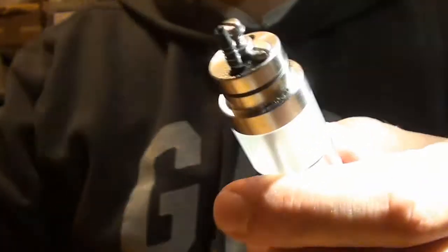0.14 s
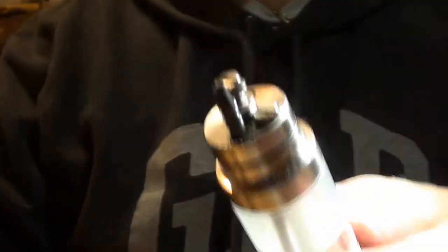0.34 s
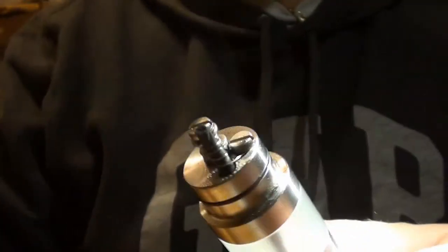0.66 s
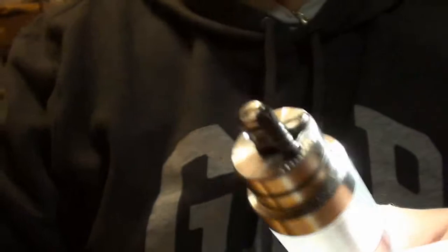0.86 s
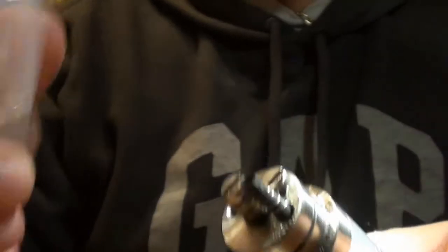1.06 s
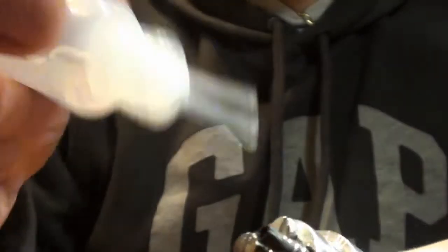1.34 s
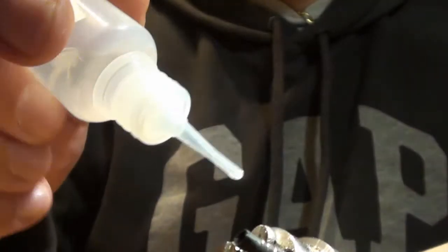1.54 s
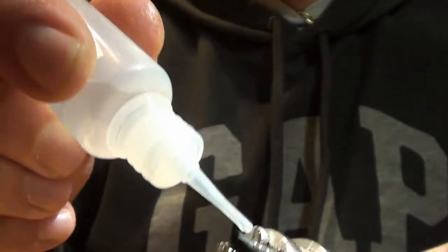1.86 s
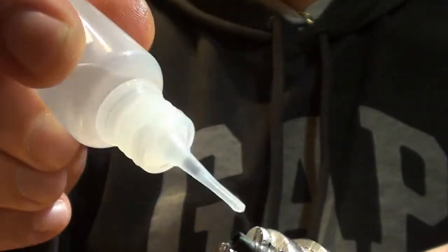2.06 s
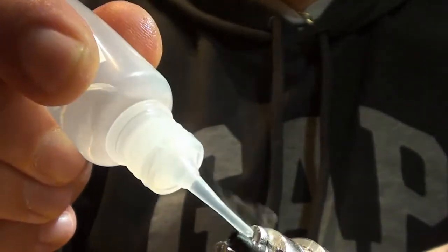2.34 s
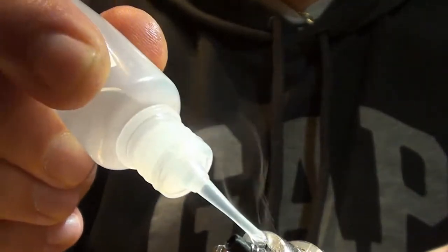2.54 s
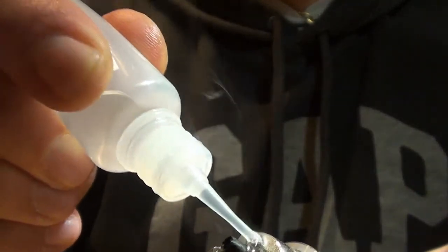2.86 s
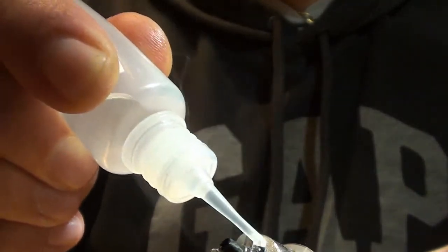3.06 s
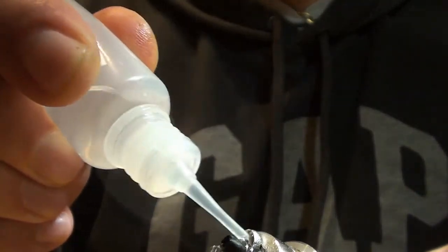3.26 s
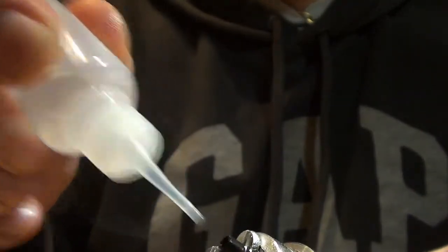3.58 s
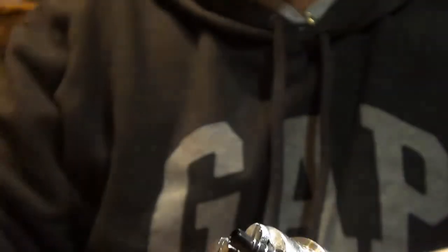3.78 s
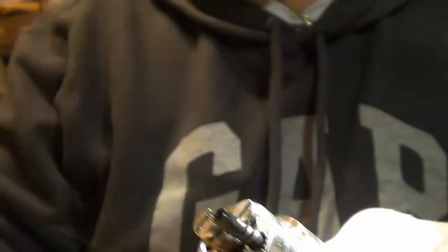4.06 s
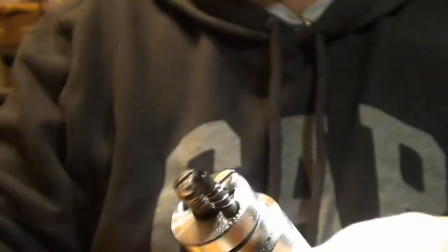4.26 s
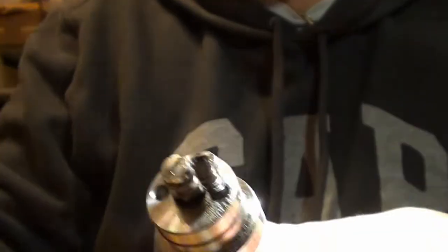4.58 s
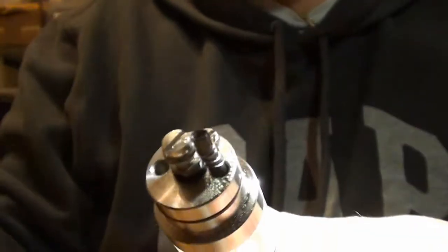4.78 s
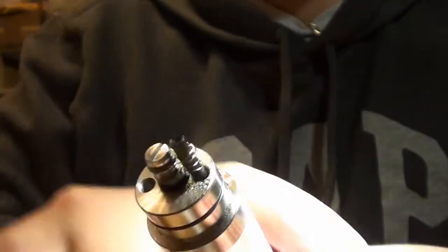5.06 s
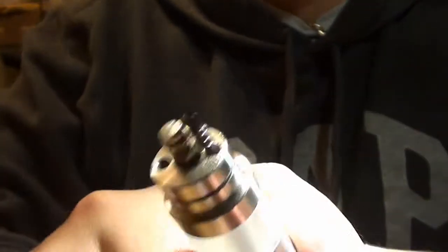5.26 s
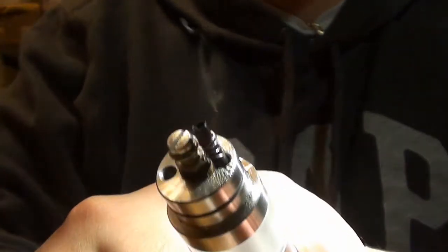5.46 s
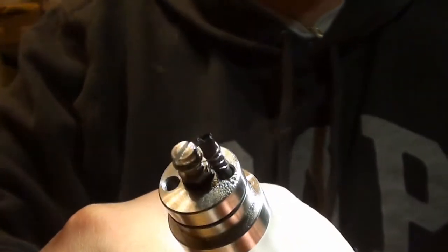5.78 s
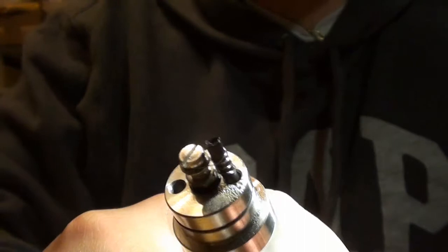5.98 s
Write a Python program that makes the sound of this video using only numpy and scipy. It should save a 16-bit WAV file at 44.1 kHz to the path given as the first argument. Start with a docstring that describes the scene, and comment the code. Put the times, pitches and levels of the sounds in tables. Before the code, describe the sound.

A hot coil's hiss dies away, a bottle scrapes off a desk, drops sizzle and crackle, then a hard knock and two sharp metal button clicks.

```python
"""A hot coil's hiss dies away in a quiet room with a humming fan; the coil is close to the microphone.
A dropper bottle slides off the desk, and drops sizzle and pop on the wire of the hand-held metal body.
The bottle is put down with a knock, sleeves rustle, and the metal button clicks twice.
Hiss, rubbing and fan are filtered noise; pops, knocks and clicks are sharp impulses that set bodies ringing."""
import sys
import numpy as np
from scipy import signal
from scipy.fft import rfft, irfft
from scipy.io import wavfile
from scipy.ndimage import map_coordinates

SR = 44100
rng = np.random.default_rng(int(sys.argv[2]) if len(sys.argv) > 2 else 0)


def log_audio(samples):
    """Write samples as a 16-bit WAV file to the path given in sys.argv[1]."""
    # one column per channel
    frames = np.atleast_2d(samples).T
    # limit to full scale, then quantise
    limited = np.clip(frames, -1, 1)
    pcm = np.round(limited * 32767).astype(np.int16)
    wavfile.write(sys.argv[1], SR, pcm)


N = 270312
TIME = np.arange(N) / SR   # seconds
HZ = np.maximum(np.arange(N // 2 + 1) * SR / N, 1)   # frequencies of the whole-scene spectrum


def from_db(db):
    """Turn decibels into a gain."""
    return 10 ** (np.asarray(db) / 20)


def rms_one(x):
    """Scale a sound to an rms of one."""
    return x / np.sqrt(np.mean(x ** 2) + 1e-20)


def level(rows):
    """Gain along a (time, dB) curve that dies away quickly beyond its ends."""
    s, db = np.transpose(rows)[:2]
    outside = np.abs(TIME - np.clip(TIME, s[0], s[-1]))
    return from_db(np.interp(TIME, s, db) - np.minimum(250 * outside, 100))


def colour(x, points):
    """Filter a sound by a (Hz, dB) curve."""
    hz, db = np.transpose(points)
    gain = from_db(np.interp(np.log(HZ), np.log(hz), db))
    return irfft(rfft(x) * gain, N)


def cut(x, hz, kind, order=2):
    """Low-pass or high-pass filter."""
    sos = signal.butter(order, min(hz, .45 * SR), kind, fs=SR, output="sos")
    return signal.sosfilt(sos, x + 1e-18)


def resonate(x, hz, width):
    """One resonance, with a gain of one at its top."""
    r = np.exp(-np.pi * width / SR)
    feed = np.array([1, 0, -1]) * (1 - r * r) / 2
    return signal.lfilter(feed, [1, -2 * r * np.cos(2 * np.pi * hz / SR), r * r], x)


def noise():
    """White noise."""
    return rng.standard_normal(N)


def grains(per_s, spread_db):
    """Random tiny impacts of uneven size, scaled to an rms of one."""
    hits = rng.random(N) < per_s / SR
    return rms_one(noise() * hits * from_db(spread_db * noise()))


def swell(s, length):
    """A burst that rises quickly and ebbs over its length."""
    age = np.clip((TIME - s) / length, 0, 10)
    return (1 - np.exp(-11 * age)) * np.exp(-age ** 4)


def push(s, rise, ebb):
    """A quick rise, then an exponential ebb."""
    age = np.maximum(TIME - s, 0)
    return (1 - np.exp(-age / rise)) * np.exp(-np.minimum(age / ebb, 40))


def sweep(s, half_length):
    """A smooth rise and fall around a peak."""
    return 1 / np.cosh(np.clip(np.sqrt(2) * (TIME - s) / half_length, -50, 50))


def strikes(rows):
    """One impulse for each (time, dB) row."""
    out = np.zeros(N)
    for s, db in rows:
        out[round(s * SR)] += from_db(db)
    return out


def ringing(modes, sign=-1):
    """A struck body's fading tones, peak one; sign 1 starts all alike, -1 alternates their direction."""
    t = TIME[:SR // 4]
    out = sum(from_db(db - 60 * t / t60) * np.sin(2 * np.pi * hz * t) * sign ** k
              for k, (hz, db, t60) in enumerate(modes))
    return out / np.abs(out).max()


def play(x, response):
    """Pass a sound through a response."""
    return signal.oaconvolve(x, response)[:N]


# How unlike the two channels are: (frequency [Hz], side-to-mid level [dB])
STEREO_WIDTH = [(60, -15), (150, -14.5), (380, -9), (1100, -1.5), (2380, -3.5), (5980, -7), (15000, -32)]


def diffuse():
    """Noise spread between left and right, widest near 1 kHz and almost central in the treble."""
    mid = noise()
    side = colour(noise(), STEREO_WIDTH)
    return mid + side * np.array([[1], [-1]])


ROOM_T60_S = 0.3   # time for the echo tail to fall by 60 dB


def in_room(x, wet_db, gap_s=.003):
    """Direct sound plus, after a short gap, a dense, duller tail off the desk and walls."""
    t = TIME[:SR // 2]
    tail = cut(diffuse()[:, :len(t)], 4600, "low", order=1)
    tail = tail * from_db(-60 * t / ROOM_T60_S) * (t > gap_s)
    tail /= np.sqrt(np.sum(tail ** 2))
    return x + from_db(wet_db) * np.array([play(x, side) for side in tail])


# Hot coil, before a small boost: (time [s], level [dB], treble [dB], counted from the first row)
HISS = [(0.0, -48, -2), (0.246, -48.5, -4), (0.39, -53, -8)]
# Tone of the hiss: (frequency [Hz], relative level [dB per Hz])
HISS_COLOUR = [(700, -35), (1300, -7.5), (2100, -4), (3300, -7), (4100, -1), (5600, -4.5), (7200, 1),
               (9500, -3.5), (12000, -7), (14500, -10), (15700, -15)]
# Echoes off nearby surfaces as the coil moves away: (delay at the start [ms], growth [ms per s], gain [ratio])
HISS_ECHOES = [(.415, 0.12, .5), (1.2, .06, .24)]


def coil_hiss(boost_db=1.5, rush_db=-5.5):
    """A smooth hiss, combed by close echoes, dulls as the wire cools."""
    s, _, treble_db = np.transpose(HISS)
    jet = rms_one(colour(noise(), HISS_COLOUR))
    treble = colour(jet, [(6000, -40), (10000, -1)])
    treble_gain = from_db(np.interp(TIME, s, treble_db - treble_db[0]))
    jet = jet + treble * (treble_gain - 1)
    # reading the hiss at an ever later delay gives the moving echoes
    echoes = sum(gain * map_coordinates(jet, [(TIME - (delay + growth * TIME) / 1000) * SR], order=3)
                 for delay, growth, gain in HISS_ECHOES)
    low_rush = rms_one(cut(resonate(noise(), 355, 230), 840, "low"))
    hiss = jet + echoes + from_db(rush_db) * low_rush
    return in_room(from_db(boost_db) * level(HISS) * hiss, wet_db=-9)


# Tone of the room air: (frequency [Hz], relative level [dB per Hz])
AIR_COLOUR = [(15, -55), (25, -25), (82, -20.5), (141, -7.5), (174, -9.5), (241, -6.5), (392, -11.5),
              (425, -3.5), (461, -8.5), (905, -14.5), (2260, -21.5), (4690, -22.5), (6850, -24),
              (7630, -24), (15800, -26.5)]
# Fan hum lines: (frequency [Hz], rms level [dB])
HUM = [(242, -75.5), (425.3, -66.5), (554, -73), (915, -73)]
# Thin hiss bands: (frequency [Hz], width [Hz], rms level [dB])
WHINE = [(7560, 70, -75), (8320, 110, -77)]
AIR_DB = -53.5   # rms
MAINS_HZ = 50
BUZZ_HZ, BUZZ_WIDTH_HZ, BUZZ_DB = 4820, 200, -75   # a faint electrical tick on every mains cycle


def room_tone(hum_width_hz=2.13):
    """Fan air with wavering hum lines, thin hiss bands and a faint, uneven mains buzz."""
    air = from_db(AIR_DB) * rms_one(colour(diffuse(), AIR_COLOUR))
    hum = sum(from_db(db) * rms_one(resonate(noise(), hz, hum_width_hz)) for hz, db in HUM)
    whine = sum(from_db(db) * rms_one(resonate(noise(), hz, width)) for hz, width, db in WHINE)
    cycles = (np.arange(N) % (SR // MAINS_HZ) == 0) * noise()
    buzz = from_db(BUZZ_DB) * rms_one(resonate(cycles, BUZZ_HZ, BUZZ_WIDTH_HZ))
    return air + hum + whine + buzz


# Pushes on the bottle, before a small trim: (time [s], level [dB], ebb [s], treble gain [dB])
PUSHES = [(.396, -30, .042, -5.5), (.475, -37, 0.045, -6), (.499, -38, .05, -6), (.52, -31, .043, 3.5),
          (.572, -42, 0.031, -6)]
# Tone of the sliding: (frequency [Hz], relative level [dB per Hz])
SLIDE_COLOUR = [(88, -42), (150, -18), (303, -8.5), (487, -8.5), (525, 1.5), (698, -10.5), (1060, -5.5),
                (1260, -4.5), (2400, -9.5), (3710, -11), (4320, -14), (6550, -14.5), (14000, -33.5)]
# Resonances added to the sliding: (frequency [Hz], width [Hz], gain [dB])
SLIDE_RESONANCES = [(534, 50, -8), (1270, 160, -14), (1860, 285, -5), (3760, 170, -4)]
PUSH_RISE_S = 0.0079


def slide(trim_db=-1, slip_spread_db=1.9):
    """Dense slips of the bottle's base drive the desk; each push has its own brightness."""
    slips = colour(grains(per_s=12000, spread_db=slip_spread_db), SLIDE_COLOUR)
    resonances = sum(from_db(db) * resonate(slips, hz, width) for hz, width, db in SLIDE_RESONANCES)
    slips = rms_one(slips + resonances)
    treble = colour(slips, [(3500, -41.0), (5200, -1)])
    scrape = sum(from_db(db) * push(s, PUSH_RISE_S, ebb) * (slips + treble * (from_db(treble_db) - 1))
                 for s, db, ebb, treble_db in PUSHES)
    return in_room(from_db(trim_db) * scrape, wet_db=-7.5)


# Sweeps of a sleeve: (time at the fastest [s], level [dB], half length [s])
SWEEPS = [(.86, -57, 0.46), (1.14, -50.5, .04), (1.203, -55, .008), (1.387, -52.5, 0.013),
          (1.538, -64, 0.061), (3.803, -55, 0.07), (4.015, -57.5, 0.2), (4.84, -57.5, 0.12),
          (5.163, -54, 0.1)]
# Tone of the cloth: (frequency [Hz], relative level [dB per Hz])
SLEEVE_COLOUR = [(500, -3), (1500, -5.5), (2400, -5), (3200, -4), (4200, -0.5), (5300, -3.5), (6500, 0.5),
                 (7500, 1), (9500, -5.5), (14000, -15)]
# Fingers rubbing the body, before a small trim: (time [s], level [dB], length [s], top frequency [Hz])
RUBS = [(3.434, -52, 0.028, 3520), (4.993, -45.5, 0.049, 2170), (5.046, -53, 0.078, 2040),
        (5.222, -48, 0.1, 2880)]


def handling(rub_trim_db=-2):
    """Cloth fibres brush as the arm moves; skin rubs more dully on the metal."""
    arm_motion = sum(from_db(db) * sweep(s, half_length) for s, db, half_length in SWEEPS)
    cloth = rms_one(colour(grains(per_s=9000, spread_db=1.8), SLEEVE_COLOUR)) * arm_motion
    skin = cut(grains(per_s=1300, spread_db=2), 200, "high")
    skin = cut(skin, 1700, "low", order=1)
    rubs = sum(from_db(db) * swell(s, length) * rms_one(cut(skin, hz, "low", order=12))
               for s, db, length, hz in RUBS)
    return in_room(cloth + from_db(rub_trim_db) * rubs, wet_db=-6.0)


# Knocks on the desk and soft handling thuds:
# (time [s], strength [dB], crack relative to it [dB], top of the crack [Hz])
KNOCKS = [(.613, -28.5, -14, 4000), (.748, -40, -18, 4000), (.828, -42, -24, 2000), (1.078, -40, -24, 2000),
          (4.4412, -12, -14.5, 7200), (4.688, -37, -26, 2000), (4.739, -26, -11, 4400),
          (4.773, -31.5, -19, 3000)]
# Tones of the desk top: (frequency [Hz], relative level [dB], time to fall 60 dB [s])
DESK_MODES = [(235, -21, 0.068), (308.7, -9, 0.097), (356, -8.5, 0.17), (430, -3, 0.028), (536, -8.5, 0.05),
              (600, -10, 0.055), (720, -13, .06), (840, -9, 0.07), (962, -16.5, 0.025), (1230, -11, 0.025),
              (1380, -19, 0.045), (1716, -17, 0.02), (2570, -17, 0.025)]


def knocks_and_thuds(crack_t60=0.012, rattle_db=-25, rattle_t60=0.14):
    """A short crack, then desk-top tones and a frame shudder without deep bass; soft thuds use them too."""
    t = TIME[:SR // 4]
    grit = noise()[:len(t)]
    crack_fade = from_db(-60 * t / crack_t60)
    cracks = sum(play(strikes([(s, db + crack_db)]), rms_one(cut(grit, hz, "low", order=4)) * crack_fade)
                 for s, db, crack_db, hz in KNOCKS)
    shudder = rms_one(cut(cut(noise(), 900, "low"), 230, "high"))[:len(t)]
    frame = shudder * from_db(rattle_db - 60 * t / rattle_t60)
    top = ringing(DESK_MODES, sign=1)
    body = play(strikes([(s, db) for s, db, _, _ in KNOCKS]), top + frame)
    return in_room(cut(body + cracks, 245, "high"), wet_db=-8)


# Drops flashing to vapour: (time [s], level [dB], length [s])
SIZZLES = [(1.974, -39.5, .017), (2.234, -41, 0.016), (2.257, -50, .028), (2.278, -32.5, 0.032),
           (2.33, -45, 0.047), (2.42, -37.5, 0.022), (2.44, -47, 0.042), (2.513, -43.5, .036)]
# The clearest bubbles bursting on the wire: (time [s], peak level [dB])
POPS = [(2.2385, -23), (2.2822, -24), (2.2951, -10), (2.299, -13.5), (2.3123, -16.5), (2.3418, -21),
        (2.355, -15), (2.3608, -14.5), (2.4016, -27), (2.4244, -20), (2.4665, -24), (2.5311, -26),
        (2.981, -39), (3.042, -38), (3.222, -36)]
# Tones of one burst: (frequency [Hz], relative level [dB], time to fall 60 dB [s])
POP_MODES = [(1400, -26.5, 0.0047), (2040, -21.5, 0.0059), (4320, -10.5, 0.0023), (6900, -4, 0.0017),
             (8540, -3.5, 0.0024), (11100, -8, 0.0016), (12600, -9, 0.0019), (15000, -14, 0.00127)]
# While the wire is wet: (start [s], end [s])
WET_SPAN = (2.24, 2.57)
SMALL_POPS_PER_S, SMALL_POP_DB, SMALL_POP_SPREAD_DB = 130, -32.5, 3.0


def sizzle():
    """Each drop boils off in a crowd of tiny bubbles; small extra pops last as long as the wire is wet."""
    burst = ringing(POP_MODES)
    boiling = sum(from_db(db) * swell(s, length) for s, db, length in SIZZLES)
    fizz = rms_one(play(grains(per_s=9000, spread_db=4), burst)) * boiling
    wet = (TIME > WET_SPAN[0]) & (TIME < WET_SPAN[1])
    small_hits = wet * (rng.random(N) < SMALL_POPS_PER_S / SR)
    small_hits = small_hits * from_db(SMALL_POP_DB + SMALL_POP_SPREAD_DB * noise())
    pops = play(strikes(POPS) + small_hits, burst)
    return in_room(fizz + pops, wet_db=-19, gap_s=0.013)


# Soft thud of the arm: (time [s], level [dB], length [s], frequency [Hz])
BUMP = (3.722, -55, .028, 55)


def bump():
    """The moving arm gives a soft, deep thud: a short burst of one low tone."""
    s, db, length, hz = BUMP
    return from_db(db) * swell(s, length) * np.sin(2 * np.pi * hz * (TIME - s))


# The bottle's tick: (time [s], peak level [dB])
TICK = (4.0104, -27.5)
# Tones of the plastic: (frequency [Hz], relative level [dB], time to fall 60 dB [s])
TICK_MODES = [(3000, -9, 0.0043), (4030, 0, 0.004), (7000, -3, 0.0034)]


def tick():
    """The plastic bottle gives one small tick in the hand."""
    return in_room(play(strikes([TICK]), ringing(TICK_MODES)), wet_db=-10)


# Catches of the button: (time [s], peak level [dB], 0 press to 1 release [ratio], loss per bounce [dB])
CLICKS = [(5.184, -34, 0, 8), (5.2921, -25, .2, 14), (5.3093, -19.5, .2, 5), (5.3144, -23, 0.16, 2),
          (5.321, -8.5, 0, 0), (6.0461, -23, .72, 10), (6.0618, -6, 0.89, 8)]
# Tones of the metal: (frequency [Hz], time to fall 60 dB [s], press level [dB], release level [dB])
CLICK_MODES = [(1990, 0.013, -35.5, -29), (3900, 0.0024, -19, -14), (5380, 0.0027, -14, -7),
               (6340, 0.0051, -15.5, -10), (7640, 0.0027, -3.5, 0), (8400, 0.0042, -2.5, -2.5),
               (9440, 0.0028, -5, -31), (12100, 0.0036, -19, -4.5), (15300, 0.0018, -17, -11)]
BOUNCE_S = .001   # typical time between bounces


def button(settle_s=0.00011, creep_db=-32, creep_s=0.0042, count=3):
    """Metal parts creep, catch and bounce in quick, damped contacts; press and release favour different modes."""
    def ring(release):
        """The metal's response, blended between press and release."""
        modes = [(hz, press_db + release * (release_db - press_db), t60)
                 for hz, t60, press_db, release_db in CLICK_MODES]
        out = ringing(modes) * (1 - np.exp(-TIME[:SR // 4] / settle_s))   # the ring takes a moment to build
        return out[:SR // 20] / np.abs(out).max()

    contacts = 0
    for s, db, release, loss_db in CLICKS:
        bounces = [(s + k * BOUNCE_S * rng.uniform(0.8, 1.1), db - k * loss_db) for k in range(count)]
        contacts = contacts + play(strikes(bounces), ring(np.clip(release, 0, 1)))
    friction = rms_one(play(grains(per_s=6100, spread_db=4), ring(0)))
    creep = friction * sum(from_db(db + creep_db) * sweep(s, creep_s) for s, db, _, _ in CLICKS)
    return in_room(contacts + creep, wet_db=-19.5, gap_s=0.01)


def scene():
    """Everything happens straight in front of the microphone."""
    early = coil_hiss() + room_tone() + slide() + handling() + knocks_and_thuds()
    return early + sizzle() + bump() + tick() + button()


CUTOFF_HZ = 15800


def record(dry):
    """The top is cut steeply."""
    return signal.sosfilt(signal.ellip(12, .1, 80, CUTOFF_HZ, fs=SR, output="sos"), dry)


dry = scene()
out = record(dry)
log_audio(out)
```